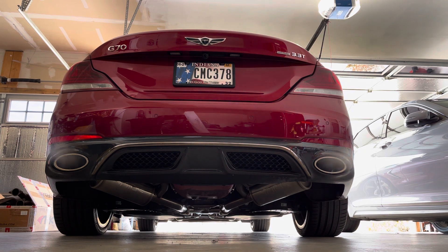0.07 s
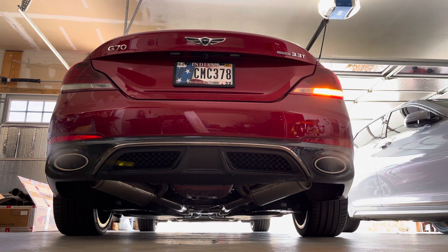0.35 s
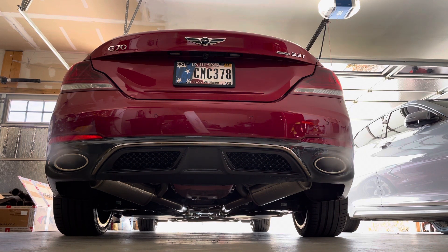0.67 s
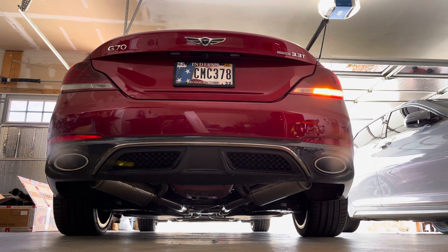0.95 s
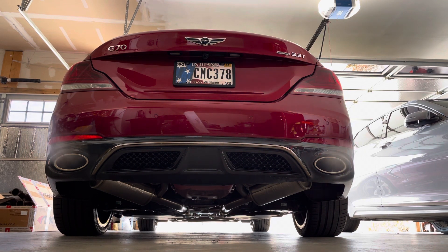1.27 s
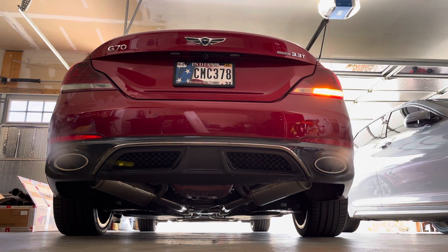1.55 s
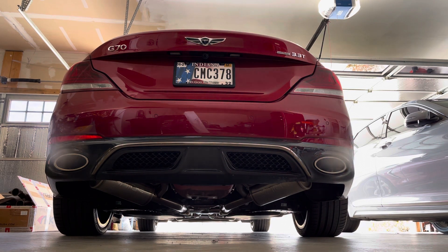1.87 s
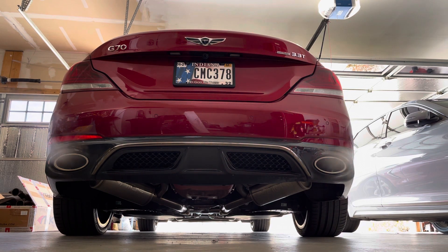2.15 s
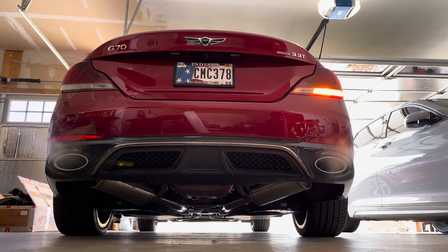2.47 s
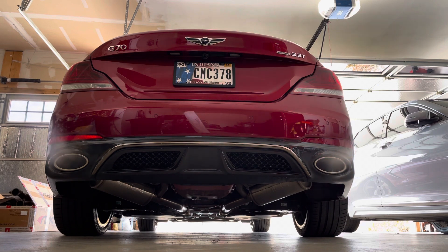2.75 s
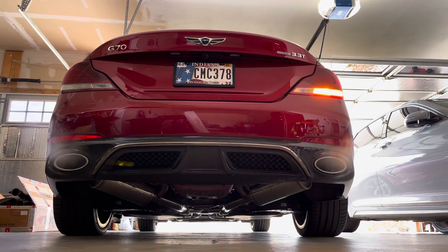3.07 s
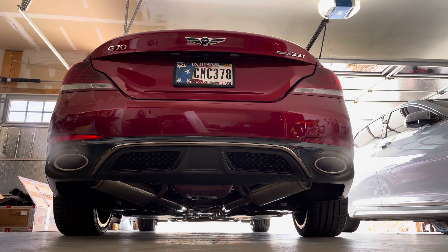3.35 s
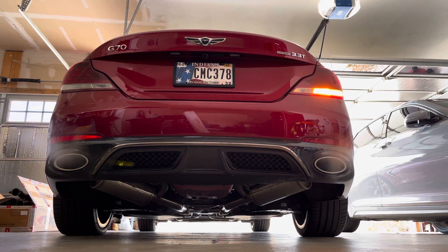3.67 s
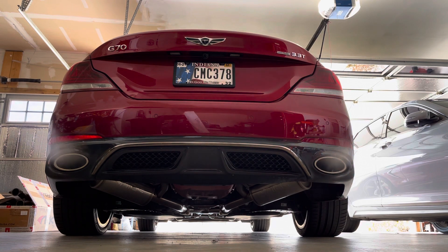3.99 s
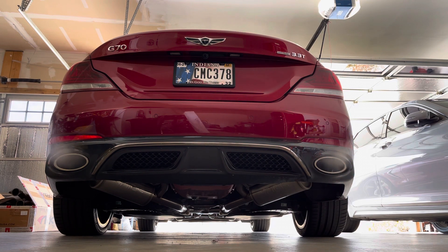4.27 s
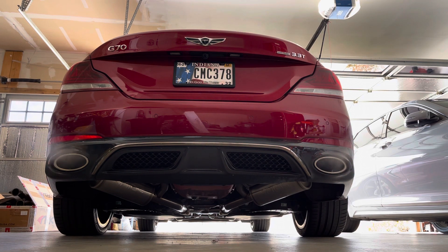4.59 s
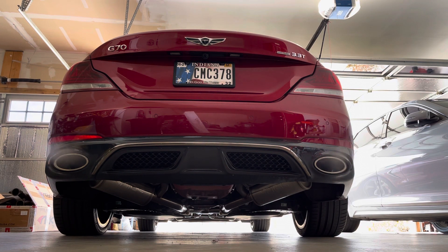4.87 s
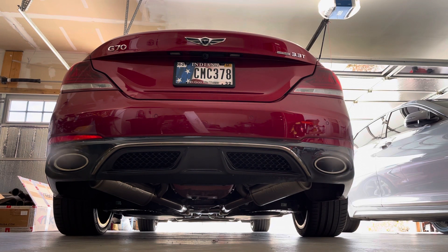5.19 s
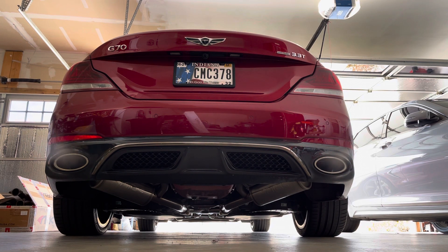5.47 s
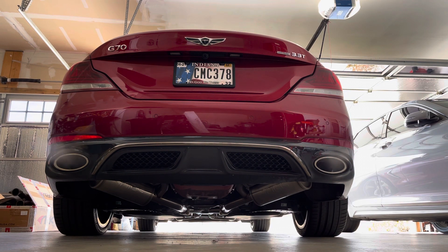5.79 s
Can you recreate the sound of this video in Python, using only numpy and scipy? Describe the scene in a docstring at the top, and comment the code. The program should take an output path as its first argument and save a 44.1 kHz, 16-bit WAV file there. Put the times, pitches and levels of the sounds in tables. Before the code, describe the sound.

A turbocharged V6 car is already idling fast after a cold start, heard from just behind its tailpipes in a garage. From 0 seconds the exhaust makes a deep, steady drone with a quick, regular throb and a soft low rumble underneath. Each pulse carries a light ring from the pipes and a small rasping puff of gas. At about 1.2 seconds the sound begins to build slowly and evenly. The drone gets a little louder, while a hollow bark, a fine metallic chatter, faint rapid ticking and a soft hiss grow faster, making the exhaust harder and raspier. The engine speed barely wavers, so the pitch holds throughout. The idle is loudest and roughest at the end, around 6 seconds, still running. The sound is close and slightly stronger on the left, with only a faint, short reflection from the garage.

```python
"""A turbocharged V6 idles fast after a cold start, heard from just behind its tailpipes in a garage.
From the outset each firing pushes out a deep pressure pulse, rings the exhaust pipes and then lets go
a rasping puff of gas. The six cylinders differ, so the note throbs once a cycle.
After about 1.2 s the load grows steadily, and to the end the exhaust gets louder and harder."""
import sys
import numpy as np
from scipy import signal
from scipy.fft import rfft, irfft, next_fast_len
from scipy.io import wavfile
from scipy.ndimage import map_coordinates

SR = 44100
rng = np.random.default_rng(int(sys.argv[2]) if len(sys.argv) > 2 else 0)


def bounce(signal):
    """Save signal as a 16-bit WAV file at the path given by the first command-line argument."""
    frames = np.transpose(np.atleast_2d(signal))
    limited = np.clip(frames, -1, 1)
    pcm = np.round(limited * 32767).astype(np.int16)
    wavfile.write(sys.argv[1], SR, pcm)


N = 261513

# cylinders in firing order, the two banks taking turns: pulse_db, tick_db, late_ms
CYLINDERS = [(2, 7.5, -0.717), (5.5, -2, -1.198), (13, 5, -0.38), (4.5, -0.5, -0.5), (11.5, 4.5, -0.63),
             (4.5, 4, -0.38)]


def crank(flutter_firings, flutter_per_s):
    """Phase is the integral of frequency: the firings so far, with a slight unevenness of the crank."""
    # engine speed, hunting about its fast idle: time_s, firing_rate_hz
    speed = [(0.0, 73.13), (0.41, 74.52), (0.74, 74.2), (1.04, 74.94), (1.25, 73.67), (1.59, 75.3),
             (1.76, 74.24), (2.14, 74.99), (2.65, 73.89), (2.84, 75.03), (3.45, 75.38), (3.82, 74.42),
             (4.34, 75.44), (4.62, 74.39), (4.85, 75.15), (5.0, 74.46), (5.65, 74.92), (5.93, 74.59)]
    time_s, firing_rate_hz = np.transpose(speed)
    count = np.cumsum(np.interp(np.arange(N) / SR, time_s, firing_rate_hz)) / SR
    return count + flutter_firings * wobble(flutter_per_s)


def firings(count, level_db, scatter_db, jitter_ms):
    """Impulse excitation: one as each exhaust valve opens, sized and timed by cylinder and by chance."""
    k = np.arange(int(count[-1]))
    cylinder = k % len(CYLINDERS)
    size, slip = rng.standard_normal((len(k), 2)).T
    late_ms = np.array(CYLINDERS)[cylinder, 2] + jitter_ms * slip
    onset = np.interp(k, count, np.arange(N)) + late_ms * SR / 1000
    onset = np.clip(np.round(onset), 0, N - 1).astype(int)
    return np.bincount(onset, amp(level_db[cylinder] + scatter_db * size), N)


def puffs(pulses, rise_s, fall_s):
    """Blowdown: gas flow rises quickly after each impulse, then decays exponentially."""
    t = np.arange(SR // 20) / SR
    flow = (1 - np.exp(-t / rise_s)) * np.exp(-t / fall_s)
    return unit(signal.fftconvolve(pulses, flow)[:N])


def drone(count, lag_firings, smear_rad, waver_db):
    """Harmonic series: the silencers round the periodic firings into a deep wave."""
    # harmonics of one bank's firing rate: order, level_db
    harmonics = [(1, -45), (2, 4), (3, -27.5), (4, -1.5), (5, -14), (6, -8), (7, -20.5), (8, -24.5),
                 (9, -23), (10, -21.5)]
    bank_angle = np.pi * (count - lag_firings)
    wave = 0
    for order, level_db in harmonics:
        gain = amp(level_db + waver_db * order / 2 * wobble(30))  # higher orders waver more
        phase = order * bank_angle - smear_rad * (order - 3) ** 2
        wave = wave - gain * np.cos(phase)
    return unit(wave)


def bark(count, split_hz):
    """Pipe resonance: pulses and a little turbulence ring the low modes; the lowest grow most with load."""
    # low modes of the pipes and silencers: pitch_hz, width_hz, level_db
    modes = [(337.8, 17.3, -12.5), (366, 18, -21.5), (417, 37, -7.5), (435.3, 78.4, -10),
             (524.6, 20.9, -1.5), (598.3, 5.3, -1), (666.7, 4.7, -20.5), (715.8, 12.2, -6),
             (747.6, 5.3, -11.5), (761.8, 8.4, -11), (823, 9.1, -16)]
    pulses = firings(count, np.array(CYLINDERS)[:, 0], scatter_db=.6, jitter_ms=.04)
    churn = .24 * puffs(pulses, rise_s=.001, fall_s=.004) * turbulence(correlation=.4)
    whole = ring(unit(pulses) + churn, modes, low_hz=310, high_hz=894, far_end=True)
    upper = filtered(whole, lambda hz: 1 / (1 + (split_hz / (hz + 1)) ** 24))
    lower = whole - upper
    return load_gain(-26.5, rise_db_per_s=1.95) * lower + load_gain(-25, rise_db_per_s=.93) * upper


def chatter(count, roughness):
    """Forced resonance: puff and pulse both drive the higher modes, where the cylinders differ less."""
    # higher modes of the pipes: pitch_hz, width_hz, level_db
    modes = [(933, 55, -9.5), (1002, 70, -6), (1074, 32, 3), (1138, 30, 3), (1192, 26, 5), (1224, 18, -3),
             (1323, 26, -15.5), (1432, 19, 1)]
    pulses = firings(count, np.array(CYLINDERS)[:, 0] / 2, scatter_db=.6, jitter_ms=.07)
    churn = puffs(pulses, rise_s=.00075, fall_s=.009) * turbulence(correlation=.47)
    return ring(unit(pulses) + roughness * churn, modes, low_hz=880, high_hz=1300)


def ticks(count, roughness, steady_flow):
    """Transient response: each puff's sharp front makes the tips tick, one bank harder than the other."""
    # modes of the tailpipe tips: pitch_hz, width_hz, level_db
    modes = [(1608, 22, 1), (1813, 21, -2.5), (2016, 110, -9), (2216, 200, -4), (2370, 190, -15.5),
             (2650, 87, -5.5), (2880, 30, -25), (3080, 14, -8.5)]
    pulses = firings(count, np.array(CYLINDERS)[:, 1], scatter_db=2.1, jitter_ms=.2)
    flow = puffs(pulses, rise_s=.0011, fall_s=.0024) + steady_flow
    churn = flow * turbulence(correlation=.35)
    return ring(unit(pulses) + roughness * churn, modes, low_hz=1550, high_hz=2770)


def hiss(count, pulsing):
    """Jet noise: the stream of gas hisses, swelling a little after each firing."""
    # spectrum of the gas rushing out: frequency_hz, density_db
    spectrum = [(900, 8), (2500, 8.5), (3300, -2), (3700, 1), (4250, 0), (4600, -3), (5350, 0),
                (5750, -5.5), (6400, -4.5), (7200, -9.5), (8500, -6), (12600, -32)]
    pulses = firings(count, np.array(CYLINDERS)[:, 1] / 2, scatter_db=3, jitter_ms=.98)
    flow = 1 + pulsing * puffs(pulses, rise_s=.003, fall_s=.0045)
    return coloured(flow * turbulence(correlation=1), spectrum)


def rumble():
    """Turbulent flow: the outrushing gas makes a low broadband noise."""
    # spectrum of the low turbulence: frequency_hz, density_db
    spectrum = [(15, -14), (40, -14.5), (70, -12), (110, -15.5), (160, -4), (220, -9), (300, -19.5),
                (400, -13.5), (600, -8.5), (1200, -49)]
    return coloured(turbulence(correlation=.32), spectrum)


def garage(x):
    """Reverberation: reflections from walls and floor decay exponentially, the treble first."""
    # time the room takes to fall by 60 dB: frequency_hz, t60_s
    decay = [(200, 0.34), (1500, 0.17), (10000, 0.043)]
    hz, t, noise = signal.stft(rng.standard_normal((2, SR // 2)), SR, nperseg=256)
    fade = amp(-60 * t / along(decay, hz)[:, None])
    tail = signal.istft(noise * fade, SR, nperseg=256)[1]
    return signal.fftconvolve(x, tail / np.linalg.norm(tail[0]), axes=1)[:, :N]


def microphones(x):
    """Path difference: the left microphone is nearer a tailpipe, so level and phase differ."""
    # level of left over right: frequency_hz, difference_db
    balance = [(75, 0.36), (150, 3.1), (230, 2), (380, 4.2), (520, 2.2), (620, 1.1), (730, 5.7),
               (950, 0.83), (1200, 7), (1750, 1.9), (2400, 6.1), (4000, 3.4), (9000, .5)]
    # phase of left ahead of right: frequency_hz, lead_rad
    lead = [(75, 0.11), (150, 0.27), (230, -.1), (350, -0.81), (450, 1), (600, -0.15), (720, 0.99),
            (880, 0.16), (1400, -1.36), (2500, 1), (4000, 0.87)]
    half = np.array([[1], [-1]]) / 2
    return filtered(x, lambda hz: amp(half * along(balance, hz)) * np.exp(1j * half * along(lead, hz)))


def load_gain(start_db, rise_db_per_s, start_s=1.24):
    """Exponential growth: a layer's level holds until start_s, then rises evenly in dB with the load."""
    loaded_s = np.maximum(np.arange(N) / SR - start_s, 0)
    return amp(start_db + rise_db_per_s * loaded_s)


def ring(x, modes, low_hz, high_hz, far_end=False):
    """Modal superposition, at rms 1: at a pipe's far end modes alternate in sign, so the ring peaks late."""
    def response(hz):
        total = 0
        for k, (pitch_hz, width_hz, level_db) in enumerate(modes):
            sign = (-1) ** (k * far_end)
            damping = 1j * hz * width_hz
            total = total + sign * amp(level_db) * damping / (pitch_hz ** 2 - hz ** 2 + damping)
        band = 1 / np.sqrt(1 + (low_hz / (hz + 1)) ** 12 + (hz / high_hz) ** 12)
        return total * band
    return unit(filtered(x, response))


def turbulence(correlation):
    """Partial coherence: white noise at two microphones, mixed from a common and an opposed part."""
    mid, side = rng.standard_normal((2, N))
    angle = np.arccos(correlation) / 2
    return np.cos(angle) * mid + np.sin(angle) * np.array([side, -side])


def wobble(knots_per_s):
    """Slow modulation: a smooth curve through random knots."""
    knots = rng.standard_normal(int(N * knots_per_s / SR) + 4)
    return map_coordinates(knots, [np.arange(N) * knots_per_s / SR])


def coloured(x, spectrum):
    """Spectral shaping: x weighted by (frequency_hz, level_db) points, at rms 1."""
    return unit(filtered(x, lambda hz: amp(along(spectrum, hz))))


def filtered(x, response):
    """Linear filtering: the spectrum of x times a complex frequency response."""
    size = next_fast_len(N + SR // 2)
    hz = np.fft.rfftfreq(size, 1 / SR)
    return irfft(rfft(x, size) * response(hz), size)[..., :N]


def along(points, hz):
    """Interpolation of (frequency_hz, value) points on a logarithmic frequency axis."""
    frequency_hz, value = np.transpose(points)
    return np.interp(np.log(hz + 1), np.log(frequency_hz + 1), value)


def amp(db):
    """Decibels to amplitude ratio."""
    return 10 ** (np.asarray(db) / 20)


def unit(x):
    """Normalisation to rms 1."""
    return x / np.sqrt(np.mean(x ** 2) + 1e-20)


def scene():
    """Superposition: the layers share one crank and one load, the bright ones outgrowing the drone."""
    count = crank(flutter_firings=.007, flutter_per_s=9)
    at_pipes, at_tips = count - .02, count - .19  # delays after the valve opens, in firings
    wave = drone(count, lag_firings=.56, smear_rad=.24, waver_db=.2)
    deep = load_gain(-14.5, rise_db_per_s=.5) * (wave + amp(-19) * rumble())
    rattle = load_gain(-40, rise_db_per_s=1.73) * chatter(at_tips, roughness=1.55)
    tips = load_gain(-47, rise_db_per_s=1.73) * ticks(at_tips, roughness=1.2, steady_flow=.35)
    stream = load_gain(-50, rise_db_per_s=1.95) * hiss(at_tips, pulsing=.47)
    bright = rattle + tips + stream
    return microphones(deep + bark(at_pipes, split_hz=590) + bright + amp(-14) * garage(bright))


def record(dry):
    """Band limiting: nothing above 12.6 kHz passes."""
    return filtered(dry, lambda hz: hz < 12600)


dry = scene()
out = record(dry)
bounce(out)
```